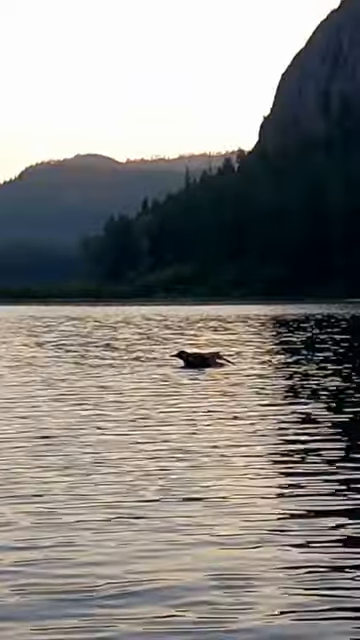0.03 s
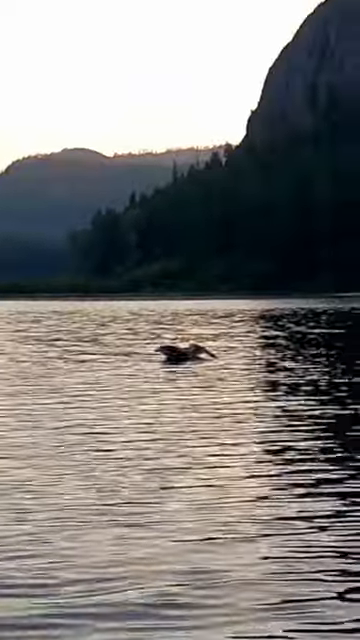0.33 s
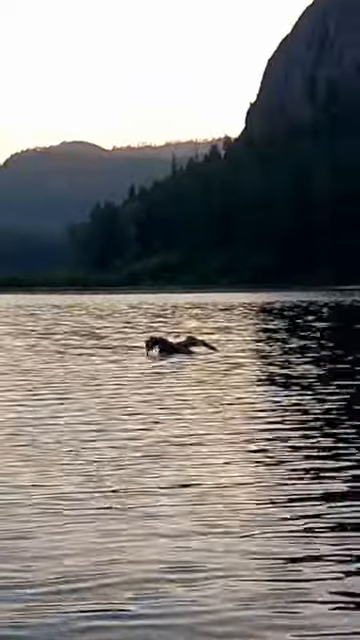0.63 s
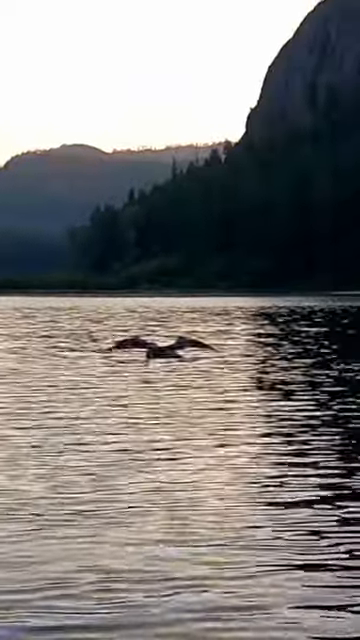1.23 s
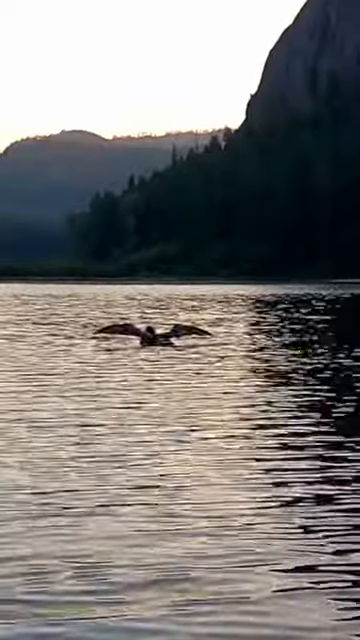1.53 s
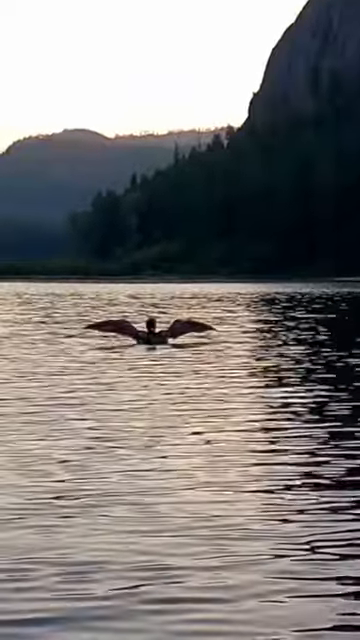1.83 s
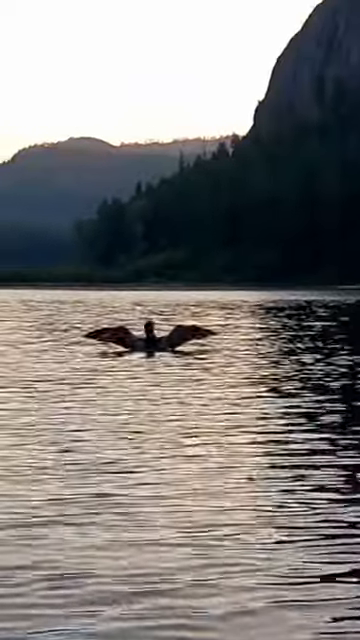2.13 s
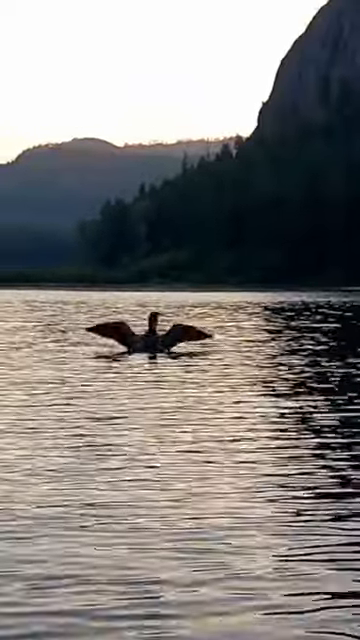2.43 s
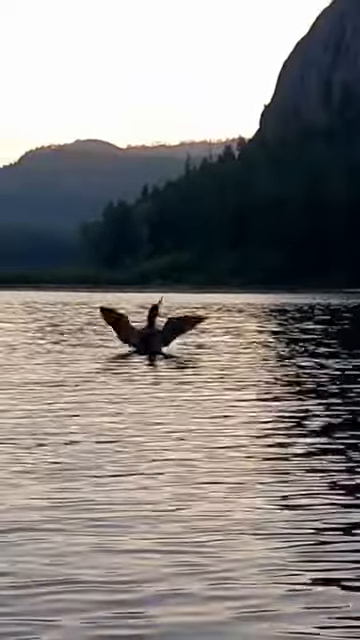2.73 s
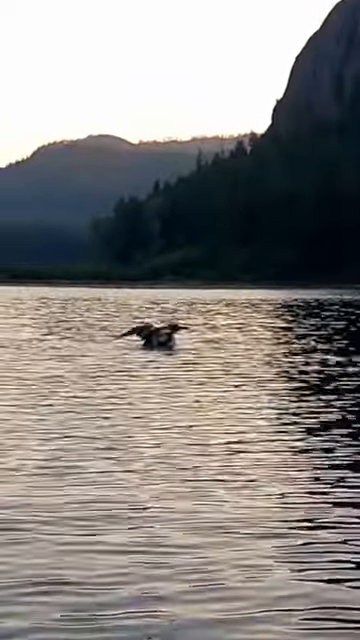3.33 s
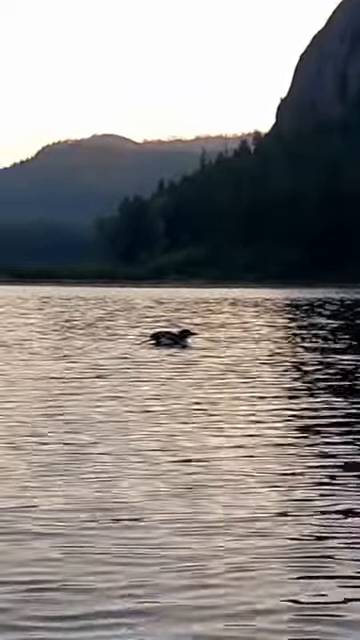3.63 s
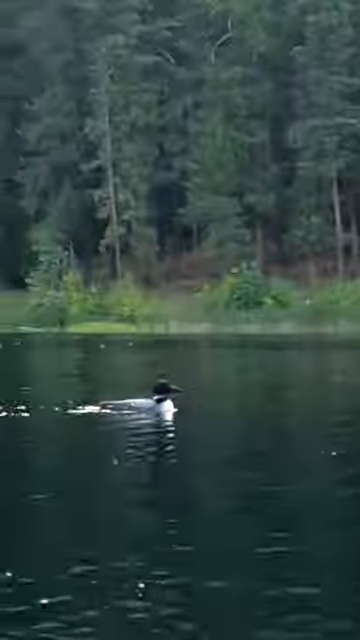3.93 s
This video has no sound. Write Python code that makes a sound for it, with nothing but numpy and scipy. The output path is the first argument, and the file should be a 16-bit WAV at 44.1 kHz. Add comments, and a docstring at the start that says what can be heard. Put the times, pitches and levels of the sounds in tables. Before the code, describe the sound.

Low, gentle wind buffets the microphone beside a calm lake. Faint chirps and a thin whistle accompany a brief rustle on the left. The microphone takes a few dull bumps, and later a bird's wings swish and softly splash the water.

```python
"""A still lake at dusk, on a hand-held stereo microphone. Light air rumbles on the ports over a faint hiss, and
a few dull knocks and scuffs of handling run through the housing. Close on the left something rustles under a
thin whistle and two faint chirps. Out on the water a bird rears up: its wings throw spray and push the water
aside, and it surges in a soft splash in which a few bubbles ring."""
import sys
import numpy as np
from scipy import signal
from scipy.fft import rfft, irfft
from scipy.io import wavfile
from scipy.ndimage import uniform_filter1d

SR = 44100
rng = np.random.default_rng(int(sys.argv[2]) if len(sys.argv) > 2 else 0)


def to_wav(sig):
    """Store sig (one row per channel, or 1-D mono) as 16-bit WAV at the path in sys.argv[1].

    Samples outside -1..1 are clipped; the rate is SR.
    """
    pcm = np.clip(np.atleast_2d(sig), -1, 1) * 32767
    pcm = np.round(pcm).astype(np.int16)
    wavfile.write(sys.argv[1], SR, pcm.T)  # frames by channels


N = 176400
T = np.arange(N) / SR
HZ = np.maximum(np.fft.rfftfreq(N, 1 / SR), 1)

# The colour of each noise at the microphone. Each row: frequency in Hz, relative level in dB.
HISS_SPECTRUM = [(100, 5), (500, 2), (800, -2.5), (1200, -1), (2200, -7.5), (3800, -11.5), (5300, -9),
                 (7000, -8.5), (8500, -21.5), (10500, -28.5), (12500, -28.5), (16000, -35)]
LOW_AIR_SPECTRUM = [(40, -14.5), (90, -10), (170, 4.5), (240, -4.5), (340, -13.5), (600, -25),
                    (1200, -25.5), (2500, -49)]
RUMBLE_SPECTRUM = [(20, 10), (32, 7), (60, -8.5), (100, -12.5), (200, -31.5), (400, -38.5), (1000, -73)]
GUST_SPECTRUM = [(20, 5.5), (35, 4.5), (60, -10), (100, -18.5), (200, -39), (400, -61)]
KNOCK_SPECTRUM = [(20, -1), (45, 5.5), (100, -1.5), (170, 0), (300, -8), (550, -16), (1000, -22),
                  (1800, -32), (3000, -43.5), (4050, -48.5), (4800, -34), (6000, -37.5), (7500, -43),
                  (10000, -49.5), (13000, -68), (16000, -47)]
SCUFF_SPECTRUM = [(150, -3), (450, 11), (800, 1), (1400, 3), (2500, -11), (4000, -15), (6000, -5.5),
                  (8000, -20), (11000, -26), (15000, -33)]
RUSTLE_SPECTRUM = [(1800, -32), (3000, -13.5), (4300, -14), (5800, -7), (6900, 4.5), (7500, -0.5),
                   (8400, -22.5), (10000, -32.5), (13000, -40), (16000, -43)]
CRUNCH_SPECTRUM = [(1900, -11), (2500, 0), (3600, 6), (4500, -8), (6000, -5), (7500, -10), (9000, -19)]
SLOSH_SPECTRUM = [(200, 7.5), (330, -2), (560, -1.5), (800, -11.5), (1100, -3.5), (1700, -11),
                  (2300, -17.5), (4000, -27)]
SPRAY_SPECTRUM = [(250, -11), (520, -11), (780, -16), (1250, -9), (2200, -4.5), (3200, -4), (4500, -2),
                  (6500, -4.5), (8500, -17), (12000, -20.5), (15000, -27)]
# How the longer noises rise and fall. Each row: time in seconds, level in dB.
LOW_AIR_LEVELS = [(0, -62), (.3, -72), (.45, -66.5), (.72, -75), (.9, -65.5), (1.2, -71), (1.34, -70.5),
                  (1.56, -64), (1.8, -74), (1.9, -65), (2.15, -69.5), (2.4, -67.5), (2.6, -67.5),
                  (2.95, -74.5), (3.1, -71), (3.17, -77.5), (3.28, -70), (3.55, -75.5), (3.8, -69),
                  (4, -74)]
RUMBLE_LEVELS = [(0, -57), (.2, -55.5), (.3, -63), (.42, -51.5), (.6, -52), (.76, -58.5), (.84, -48),
                 (.96, -55), (1.12, -54.5), (1.33, -53.5), (1.55, -53), (1.66, -59.5), (1.9, -54.5),
                 (2.14, -53.5), (2.22, -51), (2.33, -57.5), (2.45, -56), (2.79, -52), (2.9, -68),
                 (3.06, -65.5), (3.2, -72), (3.3, -57), (3.42, -52), (3.48, -70.5), (3.6, -50), (3.7, -52),
                 (3.77, -51), (3.87, -51.5), (4, -56)]
RUSTLE_LEVELS = [(.3, -105), (.42, -81), (.48, -75), (.56, -74), (.6, -71), (.66, -79), (.7, -73.5),
                 (.8, -85.5), (.86, -85.5), (1.0, -85), (1.1, -105)]
SLOSH_LEVELS = [(2.6, -99), (2.7, -73), (2.8, -80.5), (2.87, -71.5), (2.92, -70.5), (2.98, -80),
                (3.08, -83.5)]
# Short swells of noise. Each row: time of the peak in seconds, level in dB, rise and fall in seconds.
PORT_GUSTS = [(.395, -44.5, 0.022, 0.029), (.47, -44.5, 0.03, 0.056), (.57, -41, 0.039, 0.028),
              (.84, -43.5, 0.021, 0.036), (1.185, -44.5, 0.015, 0.0067), (1.39, -53.5, 0.038, 0.036),
              (1.47, -47, 0.033, 0.054), (1.57, -53, 0.023, 0.031), (2.53, -52.5, 0.028, .025),
              (3.1, -54, 0.031, 0.015), (3.33, -57, 0.054, 0.046), (3.61, -49, 0.013, 0.03),
              (3.655, -47, 0.036, 0.024)]
HAND_SCUFFS = [(.965, -75, 0.0045, 0.0054), (1.02, -74, 0.0076, 0.084), (3.42, -73.5, 0.018, 0.068),
               (3.915, -75, 0.0074, 0.029), (3.972, -64.5, 0.03, 0.023)]
NEAR_CRINKLES = [(.378, -78, 0.0034, 0.0078), (.495, -74.5, 0.021, 0.012), (.6, -63, .006, 0.0061),
                 (.618, -63.5, 0.0018, 0.0062), (.644, -70, .002, 0.009), (.685, -65, .0015, 0.0088),
                 (.7, -68, 0.0023, 0.0063), (.733, -68, 0.0017, 0.0044), (.78, -73, .015, 0.013),
                 (.802, -70.5, 0.005, 0.011), (.88, -78, 0.013, .02), (1.187, -76.5, 0.011, 0.021),
                 (1.568, -75.5, 0.012, 0.046), (2.546, -69.5, 0.0017, 0.019), (3.872, -76, .003, 0.0053)]
NEAR_CRUNCHES = [(.6, -75, .008, 0.0085), (.62, -75.5, 0.0033, 0.046), (.687, -80, 0.0037, .014)]
WING_STROKES = [(2.86, -74, 0.1, 0.065), (3.04, -75, 0.059, 0.042), (3.335, -75, 0.0082, 0.0063)]
# The glides of the whistles and the surge of the water. Each row: time in seconds, pitch in Hz, level in dB.
WHISTLE_GLIDE = [(.06, 3360, -105), (.11, 3350, -93), (.21, 3310, -90), (.32, 3500, -93), (.45, 3560, -86),
                 (.52, 3500, -97), (.6, 3580, -86), (.64, 3550, -102), (.76, 3690, -99)]
HIGH_WHISTLE_GLIDE = [(3.9, 8600, -99), (3.91, 8570, -91), (3.94, 8530, -88.5), (3.965, 8680, -89),
                      (4, 8980, -90)]
SURGE_GLIDE = [(2.62, 1062, -105), (2.68, 1097, -79.5), (2.78, 1171, -79), (2.85, 1401, -75.5),
               (2.89, 1350, -75), (2.94, 1204, -80), (2.99, 1185, -76), (3.06, 1195, -100)]
# How alike the two channels are. Each row: frequency in Hz, correlation.
STEREO_LIKENESS = [(25, 0.62), (70, 0.5), (150, 0.16), (500, 0.35), (1200, 0.1), (3000, 0.19), (7000, 0.56),
                   (12000, 0.14)]
# Where hiss and knocks sit between the channels. Each row: frequency in Hz, left minus right in dB.
HISS_BALANCE = [(300, -15.5), (1000, -3.5), (2000, 1.5), (4000, 2.5), (5500, 1.5), (7200, 8), (10000, 1.5)]
KNOCK_BALANCE = [(40, -4), (150, -7.5), (400, -10.5), (1200, -13.5), (3000, -11.5), (6000, 1.5),
                 (12000, -2.5)]
# A knock reaches the left channel first. Each row: frequency in Hz, lead in radians.
KNOCK_LEFT_LEAD = [(100, 0.26), (350, 1.24), (900, 1.5), (1800, 0), (3000, 0.27)]
# Knocks on the housing. Each row: time in seconds, strength in dB, tilt above the pivot in dB per
# octave, extra thump below it in dB.
HOUSING_KNOCKS = [(1.0079, -9.5, -3.5, 2.5), (1.0757, 3, -1, 3.5), (1.2613, 2.5, 0.76, 2),
                  (2.2282, 5.5, -1.5, 0), (3.4107, -7.5, -1, 0.5), (3.903, -8, -22, 1.5),
                  (3.9358, -6.5, -5, 0.5), (3.9582, 20, -1.2, -1)]
# Chirps under the whistle. Each row: time of the peak in seconds, level in dB, pitch in Hz.
FAINT_CHIRPS = [(.112, -81, 2990), (0.221, -80, 3120)]
# Bubbles in the splash. Each row: start in seconds, peak in dB, starting pitch in Hz, ring in seconds.
BUBBLES = [(2.895, -57.5, 1280, 0.00076), (2.925, -62.5, 1240, 0.0022), (2.932, -65, 1140, 0.0016)]


def from_db(db):
    """Decibels to gain."""
    return 10 ** (np.asarray(db) / 20)


def unit_rms(x):
    """Scale to unit power."""
    return x / np.sqrt(np.mean(x ** 2) + 1e-20)


def in_time(rows):
    """Each column after the first as a curve in time."""
    times, *columns = np.transpose(rows)
    return [np.interp(T, times, column) for column in columns]


def at_hz(rows, hz):
    """Read a table on a log-frequency axis."""
    frequencies, values = np.transpose(rows)
    return np.interp(np.log(hz), np.log(frequencies), values)


def envelope(levels):
    """A table of levels as a gain in time."""
    return from_db(in_time(levels)[0])


def swells(rows):
    """The joint envelope of exponential rises and falls, one to a row."""
    return sum(from_db(db) * np.exp(-np.maximum((s - T) / rise, (T - s) / fall))
               for s, db, rise, fall in rows)


def sounding(glide):
    """True from the first row of a glide to its last."""
    return (T > glide[0][0]) & (T < glide[-1][0])


def pan(db):
    """Left and right gains of constant power; positive dB is to the left."""
    gains = from_db(np.array([[.5], [-.5]]) * db)
    return gains / np.sqrt(np.mean(gains ** 2, axis=0))


def drift(rate_hz):
    """A random wander of rms 1, mostly slower than rate_hz."""
    return unit_rms(irfft(rfft(rng.standard_normal(N)) / (1 + (HZ / rate_hz) ** 2), N))


def noise(spectrum, flutter_db, flutter_hz, pan_db, likeness=at_hz(STEREO_LIKENESS, HZ)):
    """Fluttering stereo noise of a given colour, at rms 1."""
    white = rng.standard_normal((2, N))
    flutter = from_db(flutter_db * np.clip(drift(flutter_hz), -2, 2))
    mid, side = rfft(white * flutter)
    stereo = np.sqrt(1 + likeness) * mid + np.sqrt(1 - likeness) * side * [[1], [-1]]
    low_cut = 1 / (1 + (spectrum[0][0] / HZ / 2 ** .5) ** 4)
    high_cut = 1 / (1 + (HZ / spectrum[-1][0] / 2) ** 4)
    colour = from_db(at_hz(spectrum, HZ)) * low_cut * high_cut
    return unit_rms(irfft(stereo * pan(pan_db) * colour, N))


def evened(x, window_s=.07):
    """Even out the slow swings of a noise, so that an envelope shapes it."""
    size = int(window_s * SR)
    power = uniform_filter1d(uniform_filter1d(np.mean(x ** 2, axis=0), size), size)
    return unit_rms(x / np.sqrt(power))


def tone(hz, waver):
    """A sine of rms 1 whose pitch wanders by the fraction waver."""
    pitch = hz * (1 + waver * drift(200))
    return np.sqrt(2) * np.sin(2 * np.pi * np.cumsum(pitch) / SR)


def lake_air():
    """The bed: a low murmur of air, to the right, and a faint smooth hiss."""
    low = evened(noise(LOW_AIR_SPECTRUM, flutter_db=4, flutter_hz=21, pan_db=-7))
    hiss = noise(HISS_SPECTRUM, flutter_db=1.37, flutter_hz=10, pan_db=at_hz(HISS_BALANCE, HZ))
    return envelope(LOW_AIR_LEVELS) * low + from_db(-76) * hiss


def wind_on_ports():
    """Light air rumbles on the microphone, and gusts buffet each port separately."""
    rumble = evened(noise(RUMBLE_SPECTRUM, flutter_db=0, flutter_hz=9.7, pan_db=0))
    buffet = evened(noise(GUST_SPECTRUM, flutter_db=.5, flutter_hz=14, pan_db=3.5, likeness=-.039))
    return envelope(RUMBLE_LEVELS) * rumble + swells(PORT_GUSTS) * buffet


def knocks(pivot_hz=492, lag_cycles=.41):
    """Each knock runs through the housing as one dispersed pulse: a tick, then a trailing thump."""
    hz = np.maximum(np.fft.rfftfreq(2 * N, 1 / SR), 1)   # double length, so no tail wraps round
    # Well below the pivot, every frequency arrives lag_cycles of its own cycles late.
    lag = np.exp(-2j * np.pi * lag_cycles * np.log(hz / np.hypot(hz, pivot_hz)))
    octaves_above = np.log2(np.maximum(hz / pivot_hz, 1))
    bass = np.clip(np.log2(pivot_hz / hz), 0, 1)
    blows = sum(from_db(db + tilt_db * octaves_above + thump_db * bass) * np.exp(-2j * np.pi * hz * s)
                for s, db, tilt_db, thump_db in HOUSING_KNOCKS)
    housing = lag * from_db(at_hz(KNOCK_SPECTRUM, hz))
    left_lead = np.exp(1j * at_hz(KNOCK_LEFT_LEAD, hz) * [[0], [-1]])
    return irfft(-blows * housing * left_lead * pan(at_hz(KNOCK_BALANCE, hz)))[:, :N]


def scuffs():
    """Short grainy rubs of the hand on the housing, around the knocks."""
    return swells(HAND_SCUFFS) * noise(SCUFF_SPECTRUM, flutter_db=4.5, flutter_hz=310, pan_db=1)


def whistle(glide, waver):
    """A thin tone a little left of centre that wavers and flickers."""
    hz, db = in_time(glide)
    flicker_db = 1.8 * drift(17)
    return pan(3) * sounding(glide) * from_db(db + flicker_db) * tone(hz, waver)


def chirps(edge_s=.013):
    """Short hoarse notes on the left."""
    return pan(12) * sum(swells([(s, db, edge_s, edge_s)]) * tone(hz, waver=.024)
                         for s, db, hz in FAINT_CHIRPS)


def rustle():
    """Close on the left, a fine rustle with sharper crinkles; the heaviest also crunch lower down."""
    crunch = noise(CRUNCH_SPECTRUM, flutter_db=3, flutter_hz=300, pan_db=4)
    grain = noise(RUSTLE_SPECTRUM, flutter_db=5, flutter_hz=350, pan_db=16.5)
    return (envelope(RUSTLE_LEVELS) + swells(NEAR_CRINKLES)) * grain + swells(NEAR_CRUNCHES) * crunch


def water_surge(width_hz=280):
    """One broad band of noise whose pitch rises and falls as the water surges in the splash."""
    hz, db = in_time(SURGE_GLIDE)
    slow_noise = np.array([drift(width_hz) + 1j * drift(width_hz) for channel in range(2)])
    band = np.real(slow_noise * np.exp(2j * np.pi * np.cumsum(hz) / SR))
    return pan(-1.5) * sounding(SURGE_GLIDE) * from_db(db) * band


def plops(rise_per_s=4.8):
    """Bubbles in the splash ring for an instant, rising in pitch."""
    out = np.zeros(N)
    for start, db, hz, ring_s in BUBBLES:
        age = np.maximum(T - start, 0)
        ring = age / ring_s * np.exp(1 - age / ring_s)
        cycles = hz * (age + rise_per_s * age ** 2 / 2)
        out += from_db(db) * ring * np.sin(2 * np.pi * cycles)
    return out


def bird_on_water():
    """Out on the lake, the wings throw spray with each stroke and push the water into a slosh."""
    spray = swells(WING_STROKES) * noise(SPRAY_SPECTRUM, flutter_db=2, flutter_hz=100, pan_db=2)
    surge = water_surge()
    slosh = envelope(SLOSH_LEVELS) * noise(SLOSH_SPECTRUM, flutter_db=3, flutter_hz=73, pan_db=-2)
    return spray + surge + slosh + plops()


def scene():
    """Everything that reaches the microphone."""
    tones = whistle(WHISTLE_GLIDE, waver=.009) + whistle(HIGH_WHISTLE_GLIDE, waver=.0054) + chirps()
    return wind_on_ports() + lake_air() + knocks() + scuffs() + tones + rustle() + bird_on_water()


def record(dry):
    """The ends are eased and the top is cut steeply."""
    fade_s, stopband_hz = .004, 15500
    ease = np.clip(np.minimum(T, T[-1] - T) / fade_s, 0, 1)
    low_pass = signal.cheby2(12, 70, stopband_hz, fs=SR, output="sos")
    return signal.sosfilt(low_pass, dry * ease)


dry = scene()
out = record(dry)
to_wav(out)
```